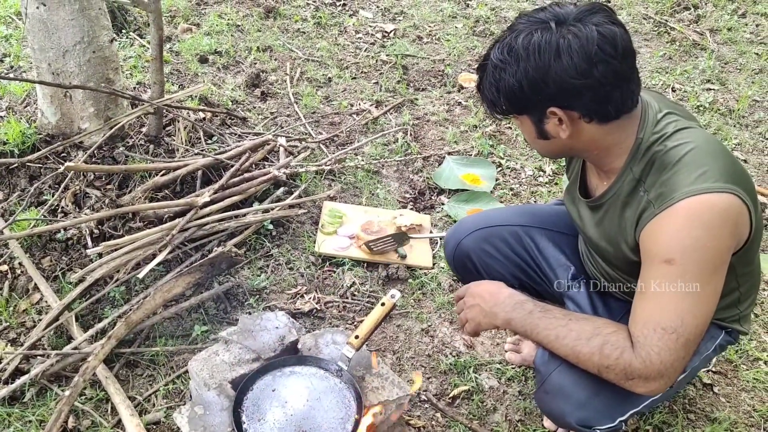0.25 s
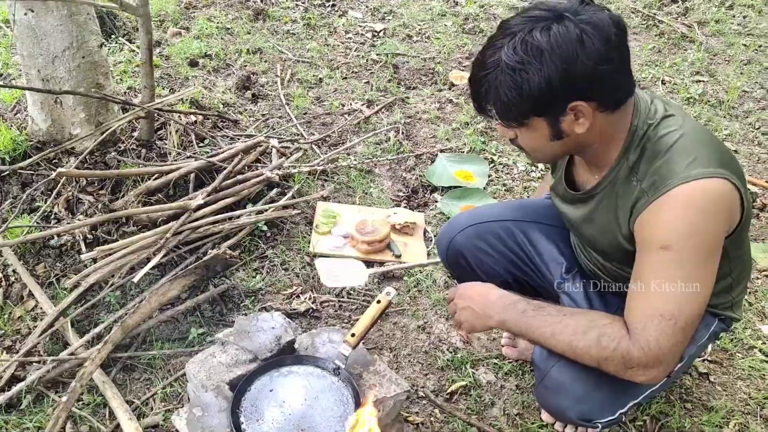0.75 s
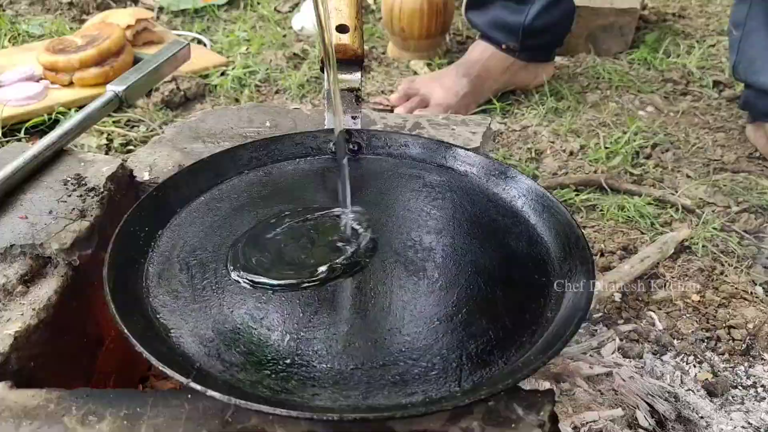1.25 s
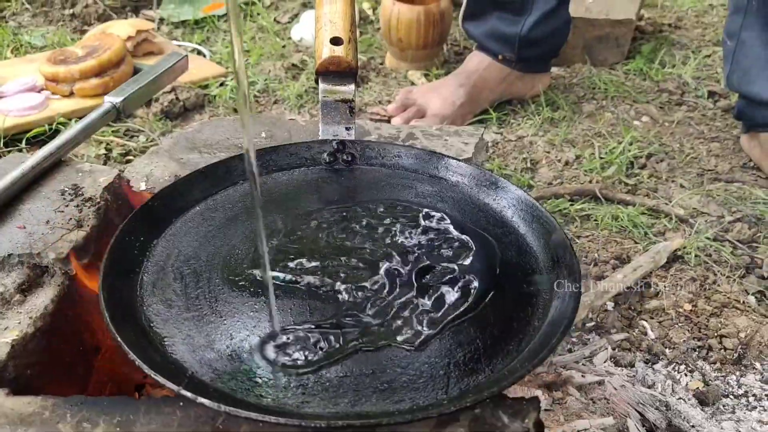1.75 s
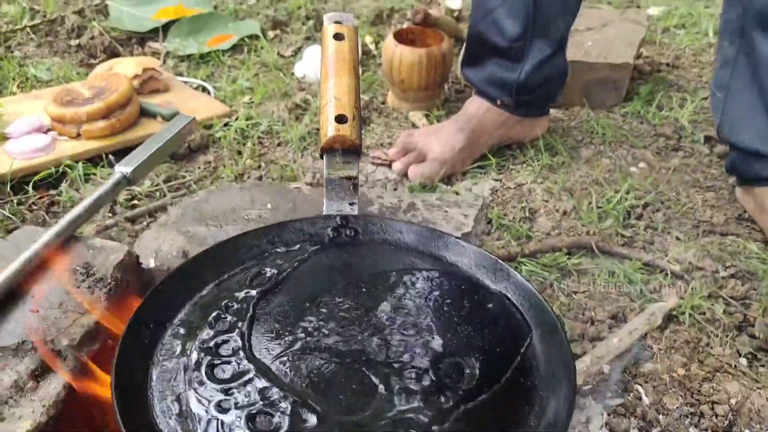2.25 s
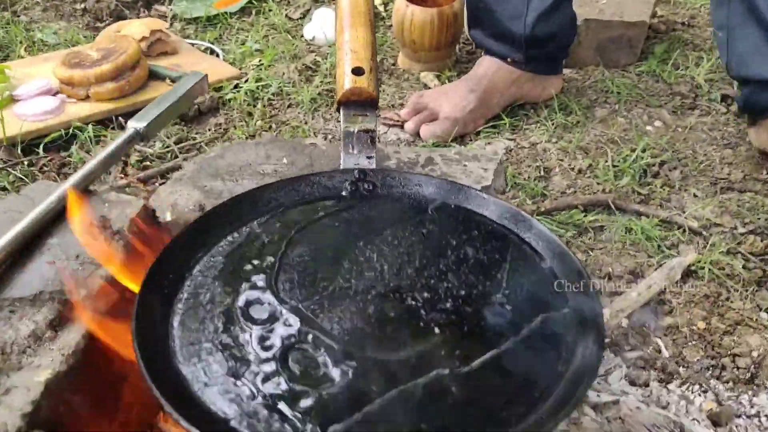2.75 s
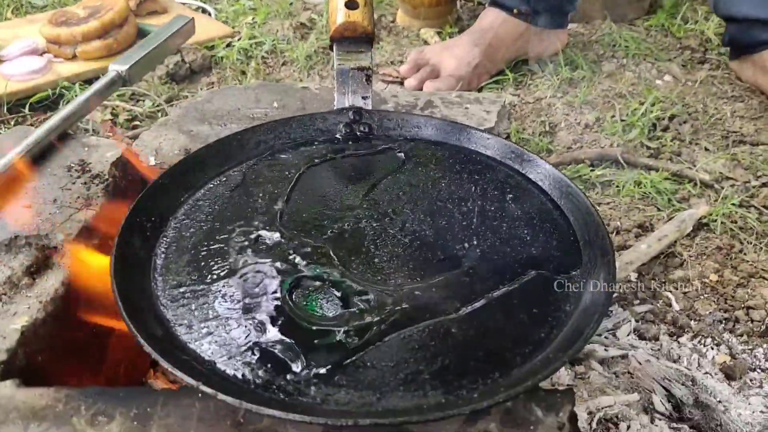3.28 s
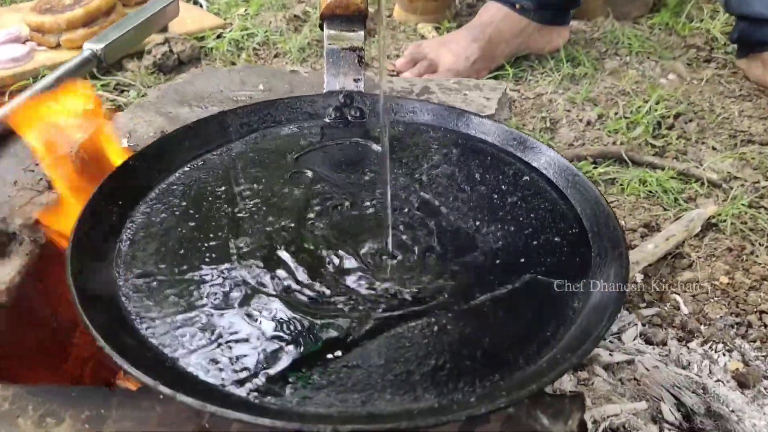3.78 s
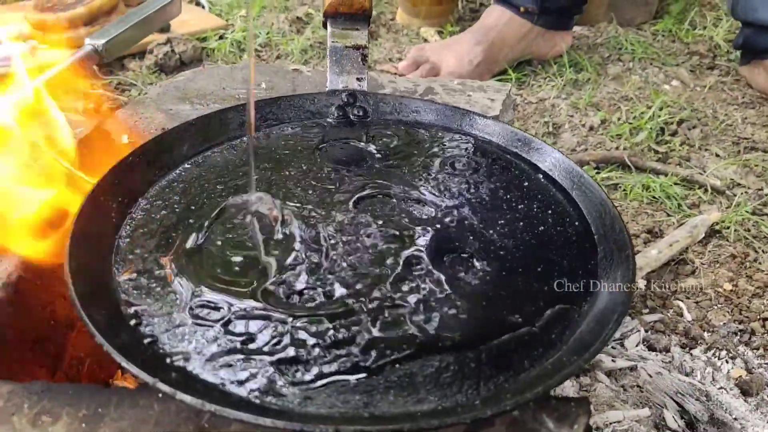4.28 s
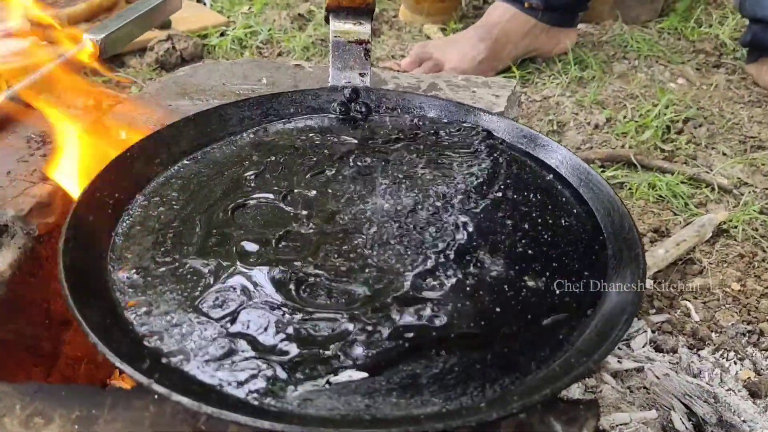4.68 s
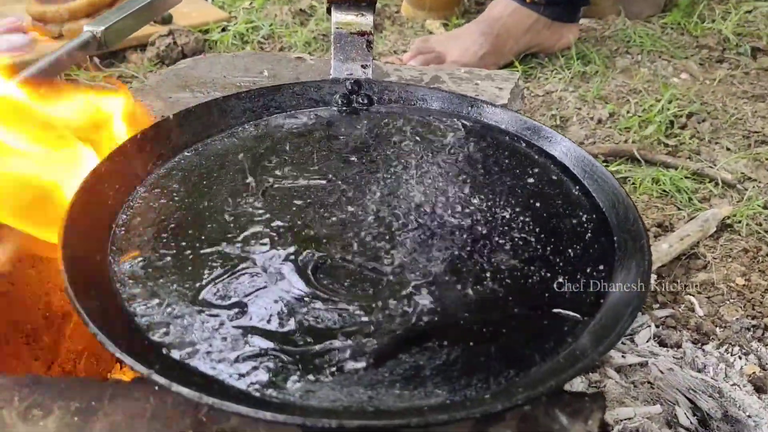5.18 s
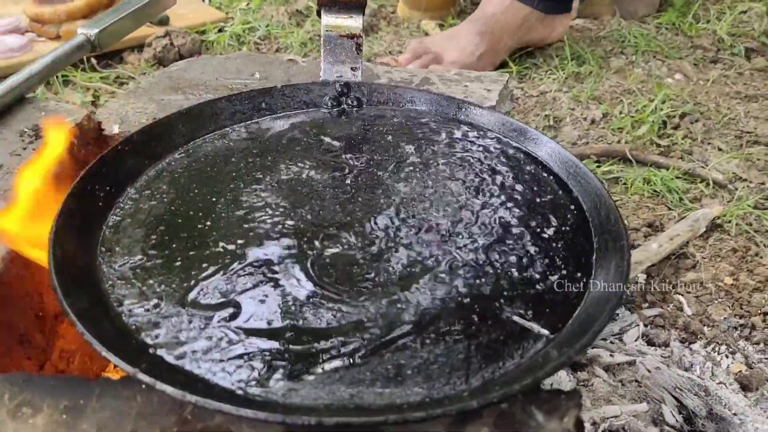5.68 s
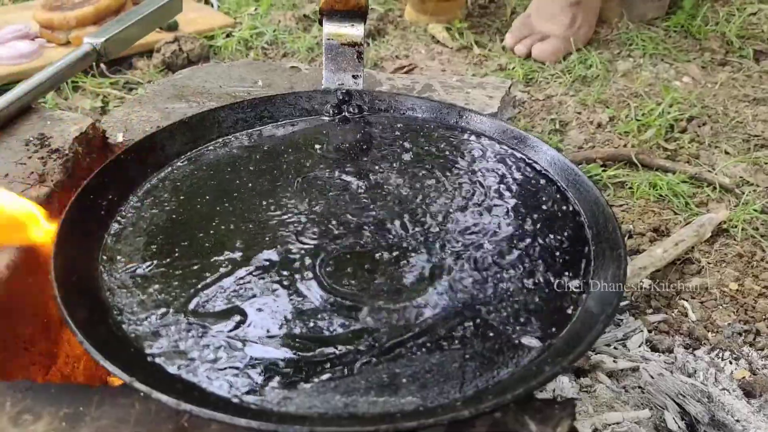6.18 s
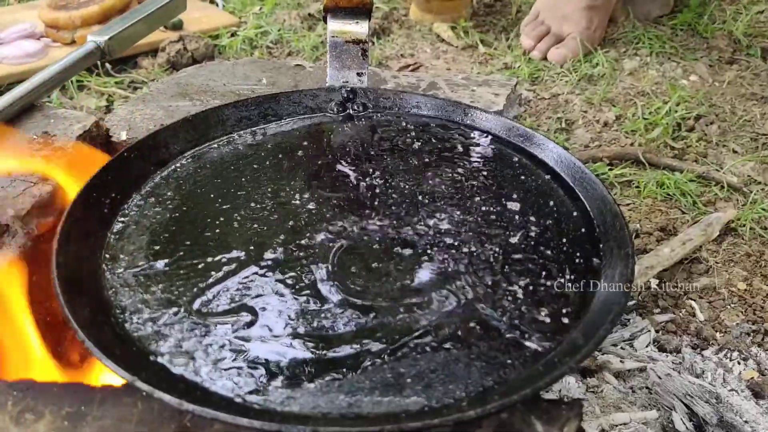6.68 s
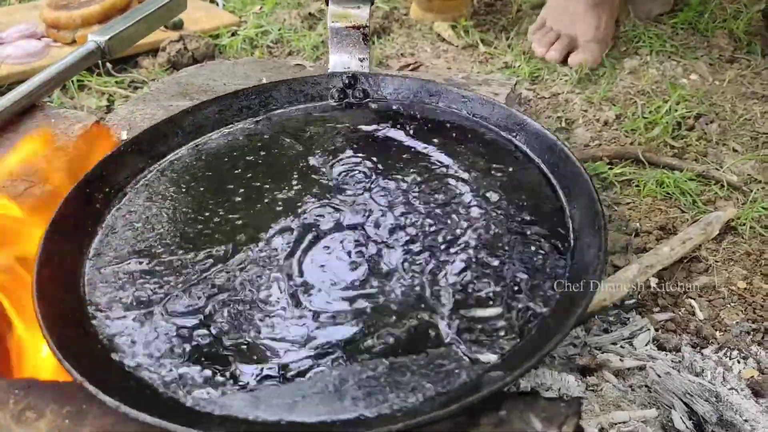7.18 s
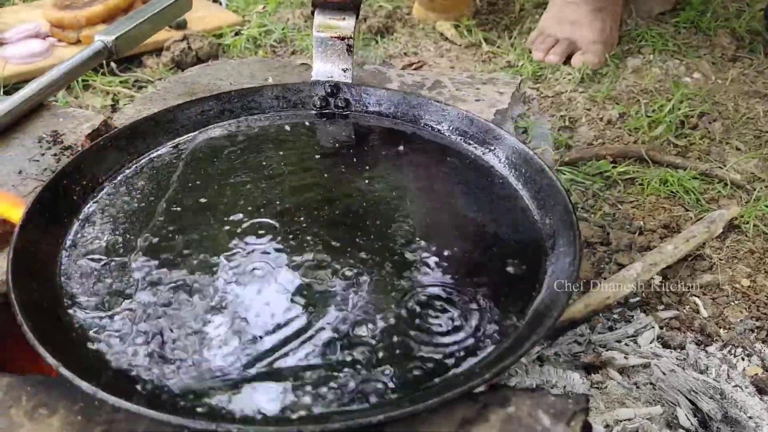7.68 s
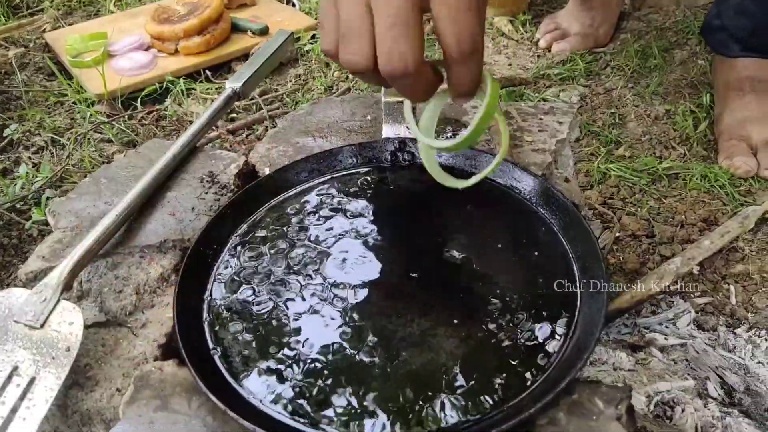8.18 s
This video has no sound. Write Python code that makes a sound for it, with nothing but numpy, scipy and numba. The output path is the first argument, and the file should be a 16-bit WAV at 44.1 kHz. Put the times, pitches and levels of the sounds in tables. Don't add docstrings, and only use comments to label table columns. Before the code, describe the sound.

A bird whistles over faint leaves and a wooden knock, then oil sizzles and crackles fiercely in an iron pan, thinning to lone pops.

```python
import sys
import numpy as np
from scipy import signal
from scipy.io import wavfile
from scipy.ndimage import uniform_filter1d
from numba import njit

SR = 44100
rng = np.random.default_rng(int(sys.argv[2]) if len(sys.argv) > 2 else 0)


def digitize_waveform(pressure):
    field = np.atleast_2d(pressure).T
    bounded = np.clip(field, -1, 1)
    quanta = np.round(bounded * 32767).astype(np.int16)
    wavfile.write(sys.argv[1], SR, quanta)


def boost(x):
    u = np.asarray(x, float) / 20
    return 10 ** u


N = 372644
T = np.arange(N) / SR
QUIET_FROM_S, POUR_S, OIL_ENDS_S = 1.241, 1.621, 7.846

# t/s, level/dB
GROVE_LEVEL = [
    [(0.0, -63), (0.212, -67), (1.086, -67), (1.206, -65.5), (1.235, -64)],
    [(1.25, -93), (1.438, -80.5), (1.615, -91)],
    [(7.83, -69.5), (7.86, -66), (8.45, -68)],
]
# f/Hz, level per Hz/dB
LEAF_SPECTRUM = [(120, -32), (200, -17.5), (481, -14.5), (1200, -17.5), (2280, -13.5), (6810, -51),
                 (7890, -48), (15800, -40)]
# f/Hz, correlation
LEAF_LIKENESS = [(60, 0.41), (380, 0.99), (2380, -0.78), (15000, -0.23)]
# f/Hz, width/Hz, level/dB
INSECT_BANDS = [(7320, 360, -7), (8440, 990, -12), (6250, 560, -17.5), (2295, 380, 1.5), (5000, 1200, -8),
                (1000, 56, -2), (1880, 68, 5)]
# f/Hz, width/Hz, level/dB
DRAUGHT = [(69.8, 70.6, -3), (99.1, 14, 5.5), (139, 17, -11), (188.2, 6.4, -1), (225.4, 14.3, -10)]
# t/s, peak level/dB, hold/s
FLARES = [(0.307, -55.5, 0.086), (1.23, -54.5, 0.087), (1.72, -49.5, 1.37), (3.712, -51.5, 0.12),
          (4.28, -57, 0.031), (6.042, -54.5, 0.044), (6.5, -53, 0.027), (7.174, -52.5, 0.047),
          (7.65, -58, 0.48), (8.3, -51.5, 0.11)]
# t/s, f/Hz, level/dB
WHISTLE = [(.61, 1610, -59), (.66, 1538, -39.5), (.73, 1447, -44), (.8, 1527, -35.5), (.9, 1651, -44.5),
           (.97, 1665, -40), (1.02, 1510, -39.5), (1.1, 1048, -57.5), (1.24, 1230, -67)]
CHIRPS = [
    [(0, 5760, -41.5), (.018, 5770, -47.5), (.03, 5000, -58.5), (.045, 3660, -58), (.058, 2880, -80)],
    [(1.108, 6240, -59), (1.114, 7000, -54.5), (1.12, 6150, -54), (1.13, 4060, -89)],
]
FAR_CALL = [(.42, 3800, -77), (.55, 3400, -73), (.7, 3200, -84), (1.0, 3290, -74), (1.1, 3550, -72),
            (1.2, 4060, -78)]
# t/s, peak level/dB
WOOD_KNOCK = [
    (0.402, -26),
]
# f/Hz, width/Hz, level/dB
WOOD_MODES = [(407, 180, 5), (1070, 1800, -3.5), (2250, 940, -0.5), (3400, 550, -3.5)]
# t/s, peak level/dB, ring level relative to the crack/dB
LATE_TICKS = [
    (8.0362, -37, -20),
    (8.1548, -22, -24),
    (8.4025, -40, -16),
]
# f/Hz, level/dB, t60/s
LATE_TICK_MODES = [
    [(6250, -4, 0.12), (6980, 2, 0.07), (7530, 8, 0.06), (8516, -6, 0.07)],
    [(4390, -17, 0.17), (5650, -21, 0.12), (6880, -8, 0.15), (7400, -8, 0.05), (8400, -3, 0.08),
     (8000, -3, 0.03)],
    [(4400, -6, 0.012), (8300, -6, .03)],
]

# pitch spread/octave, rate/(1/s), cycles to the crest, size spread/dB,
# own L-R/dB, ring growth per dB of water lost/dB
SMALL_BUBBLES = (0.36, 5200, 3.6, 2.8, -2, 0.56)
LARGE_BUBBLES = (0.32, 260, 2.57, 1.69, 6.3, 1.69)
SPRAY_BUBBLES = (0.65, 4800, 23, 8.2, 1.5, 0.05)
# t/s, f/Hz
SMALL_PITCH = [(1.62, 6700), (5.7, 6840), (5.9, 7850), (6.7, 7510), (7.85, 6470)]
LARGE_PITCH = [(1.62, 4550), (2.6, 4400), (3.6, 3680), (4.5, 3900), (5.3, 4050), (6.5, 3890), (7.85, 3860)]
# t/s, burst rate/dB
WATER_LEFT = [(1.62, -4), (2.1, 0), (6.6, 0), (6.9, -9), (7.85, -13)]
# t/s, vigour/dB, lean towards large bubbles/dB, violence of the spatter/dB
BOIL = [(1.645, -54, -5, -1), (1.85, -43.5, -4, -3), (2.2, -40, -5, -0.5), (3.12, -34.5, -3.5, 1.5),
        (3.53, -37, -1, 0.5), (3.62, -43.5, -5, 7), (3.72, -37, -0.5, 3.5), (4.14, -38, -2, 0),
        (4.31, -38.5, 2, -0.5), (5.4, -36, 3.5, -1), (5.83, -36.5, 3, -1), (6.6, -40, 3, 1),
        (6.75, -47, 7.5, -6), (6.94, -38, 7, 3), (7.1, -51.5, 11.5, -1.5), (7.2, -38.5, 1, 9.5),
        (7.65, -52, 3.5, -34), (7.77, -46, 3, 8)]
# f/Hz, width/Hz, level/dB
POOL = [(2330, 80, -26), (2030, 50, -16), (1320, 50, -8), (5900, 500, -4)]
THIN_FILM = [(2690, 110, -18)]
# t/s, share of full cancelling
POOL_DEPTH = [(2.6, 0.3), (3.7, 0.95), (7.85, 0.99)]
# t/s, peak level/dB, f/Hz
LOUD_POPS = [(2.852, -18, 3880), (3.1317, -17.5, 4040), (3.2178, -14, 3920), (3.2865, -16.5, 3690),
             (3.715, -14.5, 3660), (3.751, -29, 3060), (3.8517, -20, 2930), (3.9383, -15.5, 3400),
             (4.165, -19, 3560), (4.191, -20, 3460), (4.2779, -28, 3800), (4.319, -17.5, 2920),
             (4.406, -17.5, 3050), (4.4247, -15.5, 3600), (4.475, -16.5, 3560), (4.5708, -12, 4140),
             (4.704, -17.5, 3470), (4.829, -14, 4200), (4.879, -15, 3500), (6.8957, -25, 3890),
             (6.9892, -18, 3800), (7.268, -17.5, 4040), (7.4086, -23, 4740), (7.5469, -20, 3740),
             (7.633, -22, 4700), (7.702, -21.5, 4300),
             (1.6573, -23.5, 7100), (1.938, -22.5, 7940), (1.99, -13, 7200), (2.07, -23, 6700),
              (2.5703, -17.5, 6300), (2.5878, -13.5, 7650), (2.766, -15, 7400), (3.105, -11, 7560),
              (3.179, -12.5, 7150), (3.218, -22, 7640), (3.323, -25, 7000), (6.027, -16, 7660),
              (6.0927, -20.5, 7800), (6.371, -21.5, 8030), (6.933, -24, 7940),
             (6.6462, -12.5, 4000), (6.7795, -27, 2800), (6.798, -27, 2890), (6.857, -22.5, 2440),
             (6.929, -30, 2800), (6.959, -33, 2840), (6.99, -35, 2750), (7.034, -33, 2860),
             (7.088, -33, 3040), (7.1362, -29.5, 2800), (7.282, -29.5, 2480),
             (4.925, -17.5, 4100), (4.9448, -15.5, 4370), (4.9626, -19, 4250), (5.097, -18, 3880),
             (5.168, -20, 4120), (5.1837, -26, 3880), (5.2038, -19.5, 4200), (5.288, -23, 3910),
             (5.298, -18.5, 3640), (5.3865, -17, 4200), (5.4115, -15, 4340), (5.421, -14.5, 3840),
             (5.4414, -16, 4340), (5.4301, -15, 4120), (5.45, -19.5, 3000), (5.476, -21, 4520),
             (5.5097, -19, 4300), (5.539, -12, 4440), (5.5802, -15, 4100), (5.604, -14, 3760),
             (5.6389, -11.5, 3880), (5.687, -27, 3550), (5.707, -18, 3600), (5.7353, -26, 4330),
             (5.7526, -18, 3450), (5.8163, -22, 3930), (5.8403, -18, 4240), (5.889, -16, 4400),
             (5.907, -14.5, 3330), (5.939, -21, 3880), (5.955, -17, 3880), (5.974, -20, 3940),
             (5.9993, -20, 4270), (6.0843, -25, 2820), (6.133, -19, 4200), (6.162, -20, 4400),
             (6.1893, -15, 3830), (6.2072, -13.5, 4150), (6.2554, -19, 4350), (6.2837, -25, 4130),
             (6.2982, -14, 3880), (6.3228, -22, 4100), (6.35, -22, 4130), (6.37, -17, 4040),
             (6.385, -15.5, 3800), (6.409, -19.5, 3800), (6.429, -21, 3870), (6.4538, -24.5, 2800),
             (6.487, -22, 2830), (6.51, -20, 3800), (6.6091, -21, 3980), (6.621, -21, 3930),
             (6.635, -16, 3950),
             (3.7263, -25.5, 3230), (3.7794, -36, 3200), (3.8292, -22, 3400), (3.8765, -18, 3700),
             (3.885, -26, 3700), (3.926, -22.5, 3370), (3.9833, -22, 3800), (4.013, -25, 2920),
             (4.0354, -19, 3730), (4.0776, -18.5, 3740), (4.2443, -22, 3420), (4.305, -19.5, 3740),
             (4.351, -30.5, 2920), (4.398, -16, 3700), (4.4447, -24, 4040), (4.487, -18.5, 4440),
             (4.5394, -15, 3970), (4.6046, -16, 3880), (4.6235, -24.5, 2940), (4.681, -16.5, 3800),
             (4.7403, -19, 4300), (4.759, -22, 4200),
             (1.986, -22, 4400), (2.077, -20, 4400), (2.2788, -25.5, 4300), (2.4056, -41, 4330),
              (2.426, -22, 4250), (2.4976, -18, 3950), (2.525, -23, 4480), (2.6317, -24.5, 3800),
              (2.725, -20.5, 3830), (2.767, -20.5, 3880), (2.779, -16, 3670),
             (7.051, -23, 6160), (7.087, -18, 5700), (7.1706, -31, 7670), (7.19, -30, 8360),
             (7.2355, -20.5, 6460), (7.281, -36, 6740), (7.3407, -24, 6550), (7.5246, -23.5, 7240),
             (7.615, -28, 6110), (7.672, -25, 7100), (7.6884, -33, 8340), (7.7273, -25, 6560),
             (7.745, -21, 7400), (7.763, -23.5, 7560), (7.796, -16.5, 7070), (7.808, -30, 7360),
             (7.8383, -26, 5550),
             (6.5467, -23, 4300), (6.5796, -17.5, 4400), (6.665, -19, 4270), (6.6848, -18, 4040),
                 (6.7166, -19, 3800), (6.7428, -24, 3700), (6.7602, -21, 3770), (6.7821, -20.5, 3660),
                 (6.8018, -19.5, 3660), (7.107, -21, 3700), (7.124, -22.5, 3500), (7.146, -28, 2610)]
# t/s, peak level/dB
SPITS = [(1.621, -45.5), (2.723, -31), (3.064, -26.5), (3.129, -26), (3.216, -27), (3.286, -28.5),
         (3.546, -20.5), (3.745, -18.5), (4.03, -25.5), (5, -23.5), (5.837, -27), (5.907, -22),
         (5.966, -25.5), (6.023, -17.5), (6.234, -28), (6.384, -28.5), (6.642, -28), (6.928, -30),
         (7.74, -35.5)]
# t/s, peak level/dB, L-R/dB
SNAPS = [(1.714, -33.5, 20), (1.8138, -41, 1), (1.9505, -38, 8.5), (1.9884, -23, 9), (2.1395, -33, 11),
         (2.2218, -30, 11), (2.2892, -24, 10.0), (2.4264, -31, -2), (2.5062, -19, 3), (2.587, -25, 2.0),
         (2.9407, -31, 2.0), (2.9752, -17, 2), (3.067, -18, 0), (3.1044, -18, 5), (3.1323, -28, 2),
         (3.1795, -19, 6), (3.2206, -30, 4.0), (3.26, -20, 3), (3.2904, -16, 0), (3.3244, -31, 9),
         (3.4453, -26, 13), (3.4865, -21, 6.5), (3.5294, -23, 13), (3.5498, -23, 11), (3.6586, -22, 6),
         (3.7265, -16, 4), (3.751, -22, 9), (3.7788, -21, 6), (3.8167, -22, 8), (3.8741, -27, 1.0),
         (3.9065, -34, 1.5), (5.5089, -20, 1.0), (5.9684, -23, 5), (5.9983, -28, 7), (6.0262, -47, 0),
         (6.117, -30.5, 7), (6.2377, -25, 10), (6.3709, -35, 6), (6.3869, -21, 9.5), (6.4595, -40, 2),
         (6.5096, -28, 14), (6.547, -28, 16), (6.5725, -30, 10), (6.9307, -28, 15), (7.1891, -29, 7.0),
         (7.7428, -28, 1), (7.793, -41, 6.0)]
# t/s, peak level/dB, f/Hz
GULPS = [
    (7.13, -48, 510),
    (7.252, -39.5, 438),
    (7.327, -32.5, 477),
]
# f/Hz, width/Hz, level/dB
PAN = [(516, 340, -5.5), (767, 150, 2), (940, 185, 1), (1117, 194, 2), (1466, 107, 4.5), (1749, 138, 4),
       (2212, 115, -2.5)]
PAN_SINGING = [(2573, 270, 0), (2920, 110, 3), (3300, 185, -4), (3880, 21, 10.5), (4350, 195, 2),
               (5000, 78, -15), (7560, 80, -5)]
# f/Hz, level/dB, t60/s
FREE_MODES = [(532, -0.5, 0.17), (930, 0, 0.14), (1447, -1, 0.28), (3340, -15, 0.55), (3660, 0, 0.59),
              (3847, 12, 0.2), (4350, -30, 0.15), (4980, 13.5, 0.2), (6150, 5, 0.068), (6800, 8, 0.059)]
# t/s, peak level/dB, f/Hz
STRIKES = [(6.8, -39, 3830), (6.857, -31.5, 1447), (6.895, -35.5, 3960), (6.968, -34.5, 3750),
           (6.97, -41.5, 1447), (7.063, -32, 4030), (7.145, -33, 3620), (7.182, -38.5, 527),
           (7.233, -27.5, 4100), (7.251, -33.5, 524), (7.27, -32, 3900), (7.269, -31, 518),
           (7.332, -30.5, 500), (7.355, -26, 4260), (7.431, -38, 3660), (7.5, -45, 3660),
           (7.549, -31.5, 3660), (7.53, -34.5, 6150), (7.589, -34.5, 6150), (7.45, -37.5, 5000),
           (7.54, -41, 5000), (7.407, -38, 5080), (7.431, -45, 3970), (7.496, -34.5, 3920),
           (7.548, -32, 4270), (7.632, -22.5, 4510), (7.702, -25.5, 4450)]
# f/Hz, width/Hz, level/dB
MIC = [(5770, 1000, -1), (7800, 4600, 5)]
# f/Hz, width/Hz, level each way/dB
LEFT_BRIGHT = [(9200, 1700, 3), (6000, 2000, -1.5)]


def rms_one(x):
    return x / np.sqrt(np.mean(x ** 2) + 1e-20)


def in_time(rows):
    s, *columns = np.transpose(rows)
    return [np.interp(T, s, c) for c in columns]


def at_hz(points, hz):
    f, value = np.transpose(points)
    return np.interp(np.log(hz), np.log(f), value)


def drift(rate):
    r = np.exp(-80 * np.pi * rate / SR)
    slow = signal.lfilter([1], [1, -2 * r, r * r], rng.standard_normal(N // 40 + 2002))[2000:]
    return np.interp(np.arange(N) / 40, np.arange(len(slow)), rms_one(slow))


def ring(clicks, hz, t60):
    r, w = boost(-60 / (t60 * SR)), 2 * np.pi * hz / SR
    return signal.lfilter([0, np.sin(w)], [1, -2 * r * np.cos(w), r * r], clicks + 1e-18)


def resonances(x, modes):
    out = 0
    for k, (hz, width, db) in enumerate(modes):
        r, w = np.exp(-np.pi * width / SR), 2 * np.pi * hz / SR
        b = (1 - r * r) / 2 * np.array([1, 0, -1])
        out = out + (-1) ** k * boost(db) * signal.lfilter(b, [1, -2 * r * np.cos(w), r * r], x + 1e-18)
    return out


def peaking(x, bands):
    for hz, width, db in bands:
        a, w = boost(db / 2), 2 * np.pi * hz / SR
        alpha = np.sin(w) * width / hz / 2
        top = [1 + alpha * a, -2 * np.cos(w), 1 - alpha * a]
        bottom = [1 + alpha / a, -2 * np.cos(w), 1 - alpha / a]
        x = signal.lfilter(top, bottom, x)
    return x


def clicks_at(s, size):
    return np.bincount(np.round(np.asarray(s) * SR).astype(int), size, N)[:N]


def echoes(x, t60, wet_db):
    age = T[:SR]
    tail = rng.standard_normal((2, len(age))) * boost(-60 * age / t60) * np.minimum(age / 0.0039, 1)
    tail = tail / np.sqrt(np.sum(tail[0] ** 2))
    return boost(wet_db) * signal.fftconvolve(x * np.ones((2, 1)), tail, axes=1)[:, :N]


def grove():
    leaves, edges = 0, 200 * 2 ** np.arange(0, 6.4, 1 / 3)
    white = rng.standard_normal((2, 2, N))
    for k, (low, high) in enumerate(zip(edges, edges[1:])):
        centre = np.sqrt(low * high)
        band = signal.butter(2, [low, high], "band", fs=SR, output="sos")
        mid, side = signal.sosfilt(band, white[k % 2])
        alike = np.clip(at_hz(LEAF_LIKENESS, centre), -1, 1)
        gain = boost(at_hz(LEAF_SPECTRUM, centre) + 2.4 * drift(2.6))
        leaves = leaves + gain * (np.sqrt(1 + alike) * mid + np.sqrt(1 - alike) * side * [[1], [-1]])
    quiet = (T > QUIET_FROM_S) & (T < POUR_S)
    insects = boost(9.5 + 3.0 * drift(3.0) - 7.0 * quiet) * resonances(white[0, ::-1], INSECT_BANDS)
    level_db, = in_time(sum(GROVE_LEVEL, []))
    return boost(level_db + 4.5) * rms_one(rms_one(leaves) + insects)


def fire():
    embers_db, rise_db_per_s, fall_db_per_s = -64, 106, 93
    mid, side = resonances(rng.standard_normal((2, N)), DRAUGHT)
    roar = rms_one(mid + 0.33 * side * [[1], [-1]])
    flares = []
    for s, db, hold in FLARES:
        before, after = np.maximum(s - T, 0), np.maximum(T - s - hold, 0)
        flares.append(db - rise_db_per_s * before - fall_db_per_s * after)
    quiet = (T > QUIET_FROM_S) & (T < POUR_S)
    level_db = np.where(quiet, embers_db - 20.5, np.maximum(np.max(flares, axis=0), embers_db))
    return boost(level_db + 1.83 * drift(9.6)) * roar


def call(rows, second_db, waver=0.0047):
    hz, db = in_time(rows)
    phase = 2 * np.pi * np.cumsum(hz * (1 + waver * drift(52))) / SR
    fade = np.clip(np.minimum(T - rows[0][0] + 0.00083, rows[-1][0] - T) / 0.00085, 0, 1)
    voice = np.sin(phase) + boost(second_db) * (hz < 5200) * np.sin(2 * phase)
    return np.sqrt(2) * boost(db) * fade * voice


def thud():
    s, peak_db = WOOD_KNOCK[0]
    age = T - s
    span = np.abs(age)
    blow = boost(-60 * span / 0.031) + 0.13 * boost(-60 * span / 0.23)
    scuff = 0.1 * boost(-60 * span / 0.24)
    wood = resonances(np.where(age > 0, blow, scuff) * rng.standard_normal(N), WOOD_MODES)
    wood = signal.sosfilt(signal.butter(2, 4500, fs=SR, output="sos"), wood)
    return boost(peak_db - 6.0) * wood / np.abs(wood).max()


def birds_and_wood():
    whistle = call(WHISTLE, -42) * boost([[-4], [1.5]])
    whistle[0] = np.roll(whistle[0], 9)
    near = sum(call(c, -1.1, waver=0.016) for c in CHIRPS) + call(FAR_CALL, -44, waver=0.048) + thud()
    far = whistle + echoes(whistle, t60=1.0, wet_db=-7.5)
    return far + near + echoes(near, t60=0.29, wet_db=-1.0)


@njit
def add(out, start, size, hz, crest, rise):
    for k in range(len(start)):
        first = int(start[k]) + 1
        for n in range(max(first, 0), min(first + int(6 * crest[k]) + 1, len(out))):
            u = (n - start[k]) / crest[k]
            out[n] += size[k] * (u * np.exp(1 - u)) ** 2 * np.sin(hz[k] * crest[k] * (u + rise * u * u))


def bursts(s, size, hz, cycles, pan_db, lag_spread=4.43, rise=0.0005):
    out, lag = np.zeros((2, N)), lag_spread * rng.standard_normal(len(s)) - 1
    for side, sign in enumerate((1, -1)):
        start, level = s * SR + sign * lag / 2, size * boost(sign * pan_db / 2)
        add(out[side], start, level, 2 * np.pi * hz / SR, cycles * SR / hz, rise)
    return out


def struck(s, peak_db, ring_db, modes):
    crack = bursts(np.array([s]), boost(peak_db), np.array([7900.]), 3.0, np.zeros(1), lag_spread=0.24)
    hit = resonances(clicks_at([s + 0.0015], [boost(peak_db + ring_db)]), [(6000, 6500, 9.5)])
    return crack + sum(boost(db) * ring(hit, hz, min(t60, .2)) for hz, db, t60 in modes)


def late_pops():
    ticks = sum(struck(*hit, modes) for hit, modes in zip(LATE_TICKS, LATE_TICK_MODES))
    ticks = ticks * boost([[3.5], [-3.5]])
    return ticks + echoes(ticks, t60=0.14, wet_db=-5)


def swarm(kind, centre_hz, level_db, pan_db, crowding):
    octaves, per_s, cycles, spread_db, own_pan_db, growth = kind
    draw, span = rng.random((40000, 5)), OIL_ENDS_S - POUR_S
    pitch_scatter = rng.triangular(-1.3, 0, 1.3, len(draw))
    pan_scatter = rng.standard_normal(len(draw))
    s = POUR_S + span * draw[:, 0]
    at = (s * SR).astype(int)
    born = draw[:, 1] < per_s * span / len(draw) * crowding[at]
    size_db = spread_db * np.minimum(-np.log(draw[:, 2]), 3.5)
    size = boost(size_db) * np.sign(draw[:, 3] - .5) * born
    power = uniform_filter1d(clicks_at(s, size ** 2), size=SR // 4) + 1e-4
    size *= boost(level_db[at]) / np.sqrt(power[at])
    hz = np.minimum(centre_hz[at] * 2 ** (octaves * pitch_scatter), .4 * SR)
    spin = cycles * (0.23 + 1.23 * draw[:, 4])
    longer = boost(-growth * in_time(WATER_LEFT)[0][at] * (s > 4))
    size /= np.sqrt(longer)
    energy = np.sqrt(np.mean(spin * SR / hz))
    pan = pan_db[at] + own_pan_db + 7.5 * pan_scatter
    sound = bursts(s[born], size[born] / energy, hz[born], (spin * longer)[born], pan[born])
    return sound, clicks_at(s, size)


def single_bursts(pan_db):
    pops = LOUD_POPS
    s, peak_db, hz = np.transpose(pops)
    peak_db = peak_db + 0.5
    pan = pan_db[(s * SR).astype(int)]
    loud = bursts(s - .0004, boost(peak_db), hz, 2.1 + 2.2 * (hz < 3200), pan, lag_spread=1.2)
    delay, gain_db, shift = rng.uniform([.7, -6, .92], [1.3, 3, 1.1], (len(s), 3)).T
    rebound = bursts(s + .0018 * delay, boost(peak_db - 5 + gain_db), hz * shift, 2.4, pan, lag_spread=1.2)
    return loud + rebound, clicks_at(s, boost(peak_db - 7.5) * rng.choice([-1, 1], len(s)))


def spatter():
    s, peak_db = np.transpose(SPITS)
    s = s + .004
    spits = bursts(s, boost(peak_db + 4.0), np.full(len(s), 1100.), 0.31 + 0.12 * (peak_db < -21), 3.0)
    spits = spits + resonances(clicks_at(s, boost(peak_db + 22.5)), [(5000, 3500, 0.014)])
    s, peak_db, pan_db = np.transpose(SNAPS)
    snaps = bursts(s, boost(peak_db + 2.5), np.full(len(s), 10000.), 1.1, pan_db, lag_spread=2.2)
    s, peak_db, hz = np.transpose(GULPS)
    return spits + snaps + bursts(s, boost(peak_db), hz, 2.2, 4.0, rise=0.025)


def free_ring(blows):
    s, peak_db, strike_hz = np.transpose(STRIKES)
    patter = boost(-26.0) * blows * ((T > 7.4) & (T < 7.74))
    gurgle = boost(-34.0) * blows * ((T > 7.1) & (T < 7.6))
    out = 0
    for hz, db, t60 in FREE_MODES:
        detune_db = 86 * np.abs(np.log2(strike_hz / hz))
        hit = clicks_at(s, boost(peak_db - 6.0 - detune_db))
        hit = hit + patter * boost(-22 * np.abs(np.log2(hz / 3800))) * (hz > 3000) + gurgle * (hz < 700)
        out = out + boost(db) * (ring(hit, hz, t60) + 0.14 * ring(hit, hz * 1.005, 0.81 * t60))
    return out


def sizzle():
    vigour_db, lean_db, violence_db = in_time(BOIL)
    water_db, = in_time(WATER_LEFT)
    large_db, small_db = vigour_db + lean_db, vigour_db - lean_db
    spray_db = small_db - 16.5 + violence_db
    knock_db = large_db - 13.5 + violence_db + 0.3 * water_db
    large_hz, small_hz = in_time(LARGE_PITCH)[0], in_time(SMALL_PITCH)[0]
    pan_db = 3.5 + 0.22 * (T - POUR_S)
    crowding = boost(water_db + 2.8 * drift(9) + 1.5 * drift(45))
    large, blows = swarm(LARGE_BUBBLES, large_hz, large_db + 0.5, pan_db, crowding)
    small, taps = swarm(SMALL_BUBBLES, small_hz, small_db, pan_db, crowding)
    spray, _ = swarm(SPRAY_BUBBLES, np.full(N, 13890), spray_db, pan_db, crowding)
    loud, tear = single_bursts(pan_db)
    crack = resonances(tear, [(5000, 4100, 3.7)])
    jolts = blows / boost(large_db)
    mid, side = resonances(np.array([jolts, jolts * rng.choice([-1, 1], N)]), PAN)
    knock = boost(knock_db) * rms_one(mid + .5 * side * [[1], [-1]])
    knock = knock + boost(10.5 + 0.85 * water_db) * resonances(tear, PAN)
    singing = boost(7.5) * resonances(blows + 0.32 * taps + 3.05 * tear, PAN_SINGING)
    iron = (singing + crack + free_ring(blows)) * boost([[1.5], [-1.5]])
    thinning = boost(np.interp(T, (6.7, 6.78), [0, -5]))
    return large * thinning + small + spray + loud + spatter() + knock + iron


def oil_in_pan():
    oil, depth = sizzle(), np.clip(in_time(POOL_DEPTH)[0], 0, 1)
    thin = np.interp(T, (2.5, 3.0), [.9, 0])
    oil = (1 - depth - thin) * oil + depth * peaking(oil, POOL) + thin * peaking(oil, THIN_FILM)
    return (oil + echoes(oil, t60=0.2, wet_db=-6.5)) * (T < OIL_ENDS_S)


def scene():
    first = birds_and_wood() * (T < QUIET_FROM_S)
    return first + oil_in_pan() + late_pops() + grove() + fire()


def roll_off(x):
    return signal.sosfilt(signal.butter(12, 16650, fs=SR, output="sos"), x)


def record(dry):
    left = peaking(dry[0], LEFT_BRIGHT)
    right = peaking(dry[1], np.multiply(LEFT_BRIGHT, [1, 1, -1]))
    mix = peaking(np.array([left, right]), MIC)
    mix = signal.sosfilt(signal.cheby2(12, 50, 16200, fs=SR, output="sos"), mix)
    mix = signal.sosfilt(signal.butter(2, 60, "high", fs=SR, output="sos"), mix)
    return roll_off(mix)


dry = scene()
out = record(dry)
digitize_waveform(out)
```